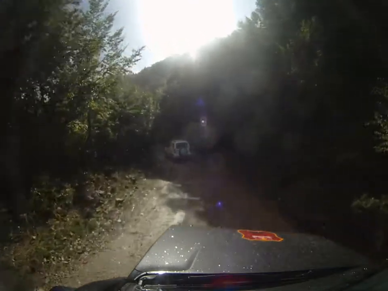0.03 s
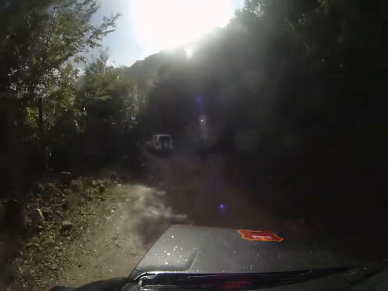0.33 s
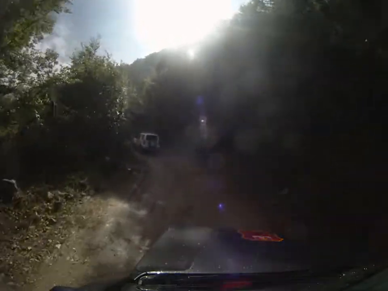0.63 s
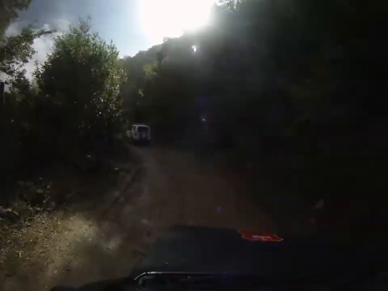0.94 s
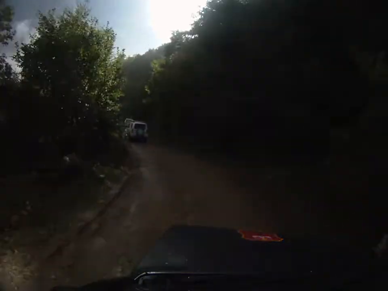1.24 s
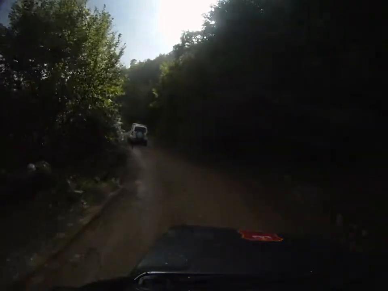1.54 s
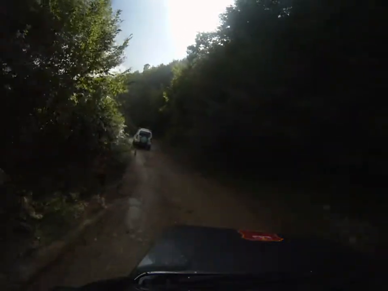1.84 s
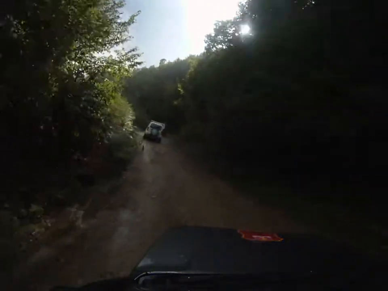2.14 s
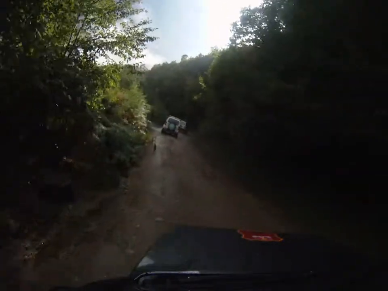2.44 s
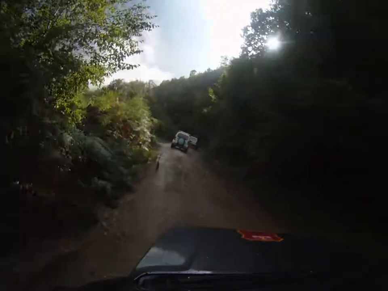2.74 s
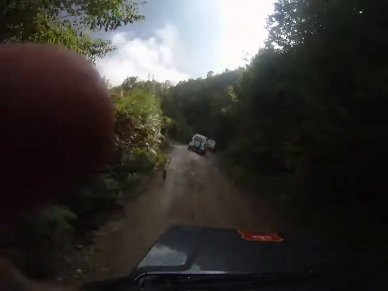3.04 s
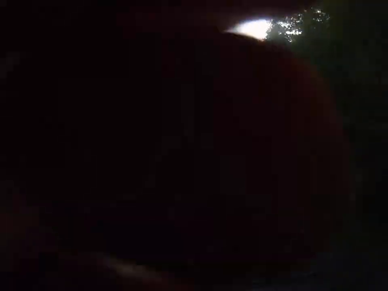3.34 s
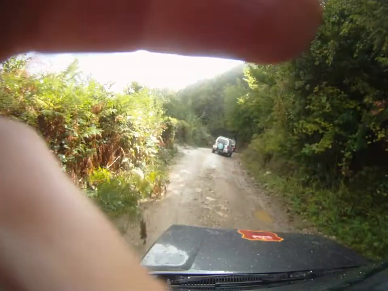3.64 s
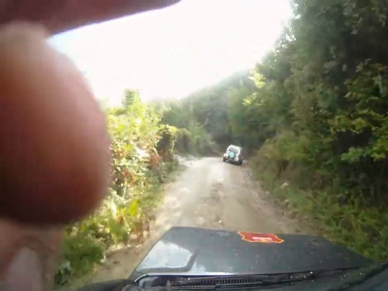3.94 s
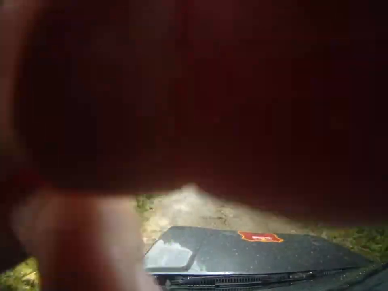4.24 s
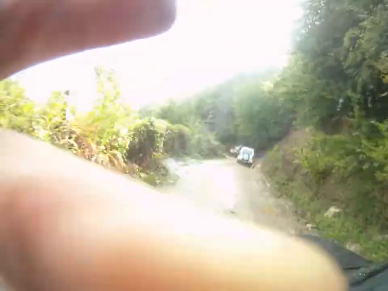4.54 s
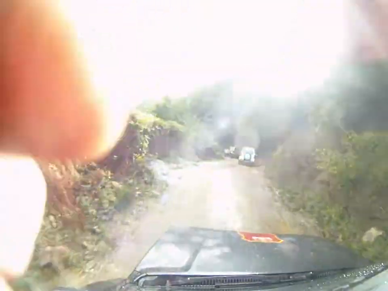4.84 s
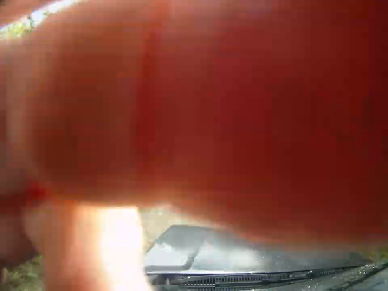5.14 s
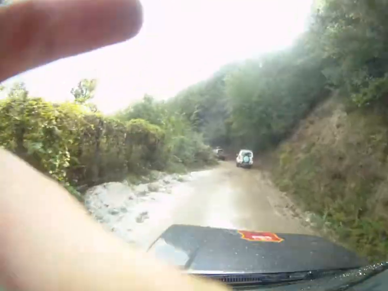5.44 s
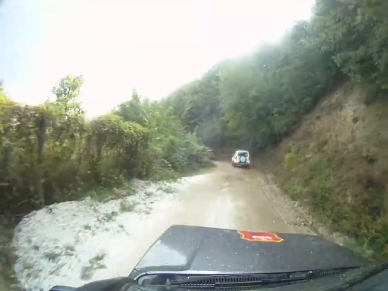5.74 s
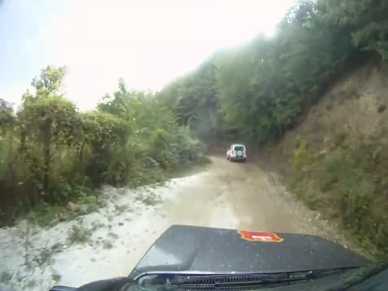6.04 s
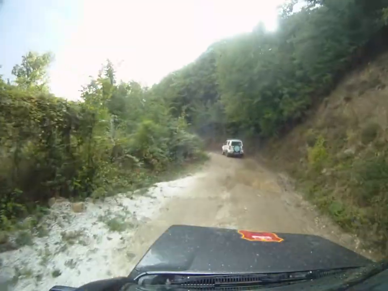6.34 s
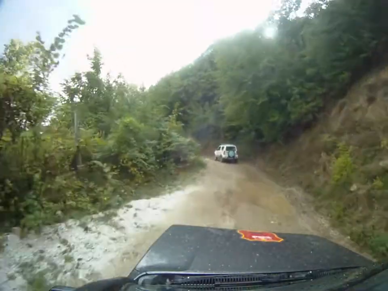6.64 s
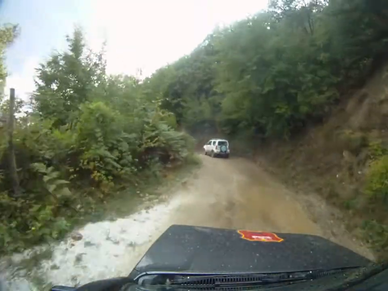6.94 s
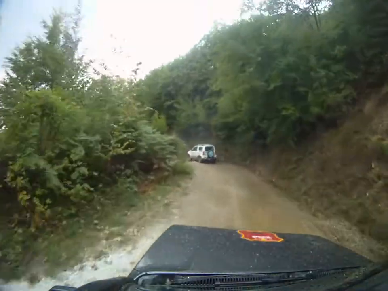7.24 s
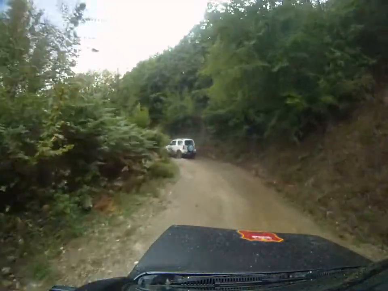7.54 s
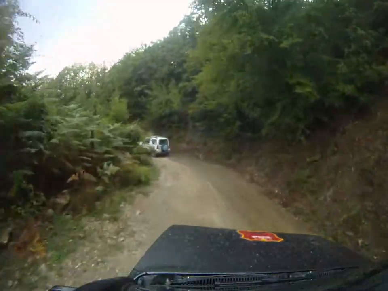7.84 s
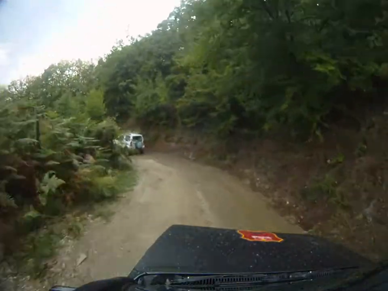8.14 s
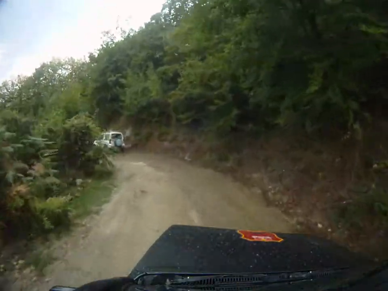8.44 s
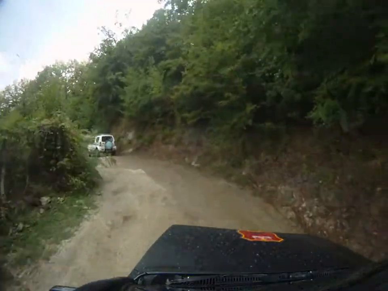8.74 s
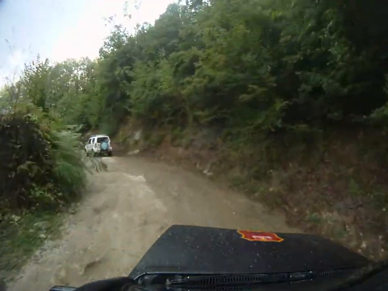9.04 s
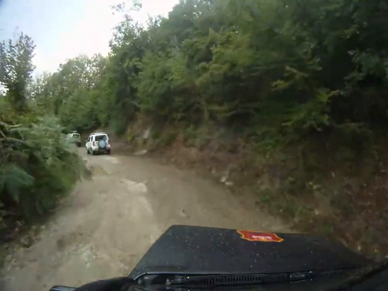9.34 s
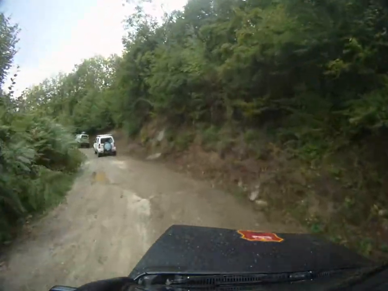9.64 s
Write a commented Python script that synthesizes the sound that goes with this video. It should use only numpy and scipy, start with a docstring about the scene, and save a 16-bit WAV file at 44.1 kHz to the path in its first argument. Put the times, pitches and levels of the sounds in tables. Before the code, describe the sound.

A vehicle's engine booms low as tyres roll over dirt and trim rattles; midway, fingers rub and knock loudly on the microphone.

```python
"""A low engine boom fills the cabin of a 4x4 crawling up a dirt track, surging as the body lurches.
Tyres roar and grind over grit, and bumps set loose trim rattling. The sound reaches a small camera
behind the windscreen, whose case colours the noise and whose electronics whine faintly.
Midway, fingers wipe the lens: beside the microphone they knock on the case, and skin sticks and slips."""
import sys
import numpy as np
from scipy import signal
from scipy.fft import rfft, irfft
from scipy.io import wavfile

SR = 44100
rng = np.random.default_rng(int(sys.argv[2]) if len(sys.argv) > 2 else 0)


def file_out(sig):
    """Save sig as 16-bit WAV at sys.argv[1]."""
    # one column per channel
    cols = np.atleast_2d(sig).T
    # limit, then scale
    lim = np.clip(cols, -1, 1)
    pcm = np.round(lim * 32767).astype(np.int16)
    wavfile.write(sys.argv[1], SR, pcm)


N = 432180
T = np.arange(N) / SR

# Excitation of the tyres, stronger on rough ground: t/s, relative level/dB
ROUGHNESS = [(0, -48.5), (1.2, -46), (1.6, -48.5), (2.4, -44), (2.9, -45.5), (4.5, -45), (5.8, -46),
             (6.4, -50.5), (7.4, -48.5), (7.75, -44.5), (8.15, -48), (9.8, -44)]
# Spectrum of small hard impacts: f/Hz, relative level/dB
GRIT_SPECTRUM = [(500, 4), (1600, 7), (2400, 6.5), (3100, -3), (4400, -7), (7500, -21.5), (10000, -11),
                 (14500, -4.5), (16000, -19)]


def gain_of(db):
    """Amplitude ratio of a level in decibels."""
    return 10 ** (np.asarray(db) / 20)


def unit_rms(x):
    """Normalisation to rms 1."""
    return x / np.sqrt(np.mean(x ** 2) + 1e-20)


def follow(rows):
    """Linear interpolation of each column over time."""
    times, *columns = np.transpose(rows)
    return [np.interp(T, times, column) for column in columns]


def add(mix, start, sound):
    """Superposition of a sound on the mix, from start in seconds."""
    part = mix[max(round(start * SR), 0):][:len(sound)]
    part += sound[:len(part)]


def drift(cutoff_hz):
    """Slow random fluctuation: low-pass noise of rms 1."""
    hz = np.fft.rfftfreq(N, 1 / SR)
    return unit_rms(irfft(rfft(rng.standard_normal(N)) * np.exp(-(hz / cutoff_hz) ** 2), N))


def bell(middle, width):
    """Gaussian envelope of height 1, width seconds wide at half height."""
    out = np.zeros(N)
    near = slice(max(int((middle - 2 * width) * SR), 0), int((middle + 2 * width) * SR))
    out[near] = .5 ** ((2 * (T[near] - middle) / width) ** 2)
    return out


def bursts(per_s, length_s):
    """Shot-noise envelope: soft pulses of uneven size at random moments."""
    starts = rng.uniform(0.08, 1, N) * (rng.random(N) < per_s / SR)
    return unit_rms(signal.oaconvolve(starts, signal.windows.hann(int(length_s * SR)))[:N])


def through_case(x, spectrum, size=4096):
    """Source and resonator: a minimum-phase filter of unit energy joins a spectrum to the case's modes."""
    # Resonances and notches of the camera case: f/Hz, bandwidth/Hz, gain/dB
    modes = [(1110, 250, 7.5), (1292, 150, -5), (1475, 170, 2), (1880, 93, 0), (2182, 550, 8),
             (3650, 180, 3.5), (6013, 524, -12), (8210, 1050, 4.5), (9930, 770, 12.5), (10820, 310, 7),
             (11720, 800, -6), (13000, 250, 0), (13300, 310, 2)]
    hz = abs(np.fft.fftfreq(size, 1 / SR))
    source_hz, source_db = np.transpose(spectrum)
    db = np.interp(np.log(hz + 1), np.log(source_hz), source_db)
    db += sum(height * .5 ** ((2 * (hz - centre) / width) ** 2) for centre, width, height in modes)
    response = np.exp(np.conj(signal.hilbert(np.log(gain_of(db)))))
    ring = np.fft.ifft(response).real[:size // 2]
    return signal.oaconvolve(x, ring / np.linalg.norm(ring))[:N]


def engine(rock_depth=0.62, surge_s=.12, sag_db=-7.5, sag_lead_s=0.086, sag_s=0.039):
    """Amplitude and phase modulation: the rocking body swells and chokes a near-pure cabin boom."""
    # Boom following the throttle: t/s, f/Hz, relative level/dB
    boom = [(0, 57.45, -28.5), (1.2, 57.2, -23), (1.7, 59.2, -20), (2.6, 60.9, -21.5), (3.3, 56, -33.5),
            (4.2, 54.89, -26.5), (4.8, 54.08, -31), (5.7, 59.65, -23), (6.3, 59.74, -31.5),
            (6.9, 60.25, -22.5), (7.5, 58.34, -25.5), (8.1, 60.34, -27.5), (8.6, 61.74, -21),
            (9.2, 62, -22.5), (9.8, 58.84, -26)]
    # Surges as the body lurches: middle t/s, relative level/dB
    lurches = [(.13, -19.5), (.53, -15), (.89, -18), (1.27, -21), (1.9, -20.5), (2.43, -17), (2.76, -19.5),
               (4.56, -36), (5.25, -24.5), (5.41, -21), (6.39, -21), (6.71, -19), (7.35, -19.5),
               (7.6, -19.5), (7.76, -18), (8.38, -23), (8.7, -23), (9.02, -20), (9.59, -18.5)]
    hz, level_db = follow(boom)
    phase = 2 * np.pi * np.cumsum(hz) / SR + .4 * drift(11)
    rocking = gain_of(level_db) * (1 + rock_depth * drift(6.9))
    surges = sum(gain_of(db) * bell(s, surge_s) for s, db in lurches)
    # The boom sags as the body lifts just before each lurch.
    lift_db = sum(sag_db * bell(s - sag_lead_s, sag_s) for s, _ in lurches)
    return np.hypot(rocking, surges) * gain_of(3 + lift_db + drift(44)) * np.sin(phase)


def track():
    """Random excitation by rough ground: body sway, tyre roar, pattering grit and squeaking trim."""
    # Spectra of the swaying body, rolling tyres and rubbing trim: f/Hz, relative level/dB
    sway_spectrum = [(10, -25), (25, 2.5), (45, 8), (70, -2.5), (95, -13.5), (130, -32), (300, -61.5)]
    tyre_spectrum = [(60, 14), (160, 8.5), (225, 19), (290, -2), (400, -3), (560, 7), (750, -1),
                     (1050, 5.5), (1600, 2.5), (2300, -5), (2900, -9.5), (4500, -16), (7000, -33.5),
                     (14500, -11.5), (16000, -68)]
    squeak_spectrum = [(2500, -14), (3700, -18), (4450, 17), (5100, -48), (7500, 13), (9000, -36),
                       (16000, -38)]
    level_db = follow(ROUGHNESS)[0] + occlusion_db()
    body, road, stones, trim = rng.standard_normal((4, N))
    sway_db = -25.5 + 0.68 * (level_db - level_db.mean()) + 3.9 * drift(4.2)
    sway = gain_of(sway_db) * through_case(body, sway_spectrum)
    roar = gain_of(level_db + 3 + drift(3.8)) * through_case(road, tyre_spectrum)
    patter = bursts(per_s=45, length_s=.012) * gain_of(1.5 * drift(12))
    grit = gain_of(level_db - 5) * through_case(stones * patter, GRIT_SPECTRUM)
    rubs = bursts(per_s=11, length_s=0.007)
    squeaks = gain_of(level_db - 28) * through_case(trim * rubs, squeak_spectrum)
    return sway + roar + grit + squeaks


def rattles(tick_t60=0.056, clatter_t60=0.29, thud_t60=0.3):
    """Damped impacts: ticks, thuds and clatter decay exponentially over a light jiggle that follows the
    roughness of the ground, drops while the microphone is covered and wanders at random."""
    # Ticks of grit and trim: t/s, level/dB
    tick_events = [(0.052, -33.5), (0.266, -36), (0.35, -40), (.523, -29.5), (0.697, -32.5), (1.193, -31),
                   (1.35, -34), (1.99, -29.5), (2.15, -35), (2.207, -36), (2.848, -40), (7.276, -36),
                   (9.054, -28)]
    # Stones and ruts jolt the body: t/s, clatter level/dB, thud level/dB, rise time/s
    bumps = [(.41, -36, -39, 0.023), (.523, -44, -35, .004), (.70, -36.5, -43, 0.028),
             (0.896, -68, -33, 0.0061), (1.193, -59, -44, .005), (1.351, -47, -37, 0.0043),
             (1.991, -53, -39, 0.0056), (2.419, -41, -31, 0.0089), (2.846, -38.5, -34.5, 0.0034),
             (5.8, -39, -52, .006), (7.32, -39, -52, 0.026), (7.375, -43, -37, 0.0093),
             (7.572, -43, -34, 0.013), (7.6, -34, -36, 0.045), (7.79, -38, -56, .025),
             (9.053, -24.5, -27.5, 0.0031), (9.552, -37, -44, .02)]
    # Spectra of the loose parts and the jolted body: f/Hz, relative level/dB
    clatter_spectrum = [(150, -30), (600, -3), (1080, -3.5), (1500, 0.5), (1850, 4), (2300, -13.5),
                        (3000, -16.5), (4500, -53), (10000, -22), (16000, -23)]
    thud_spectrum = [(60, 6), (150, 3.5), (225, 10.5), (310, -19.5), (1500, -40)]
    t = T[:SR // 2]
    ticks, shake, thuds = np.zeros((3, N))
    for s, db in tick_events:
        add(ticks, s, gain_of(db - 60 * t / tick_t60) * np.minimum(t / 0.0041, 1))
    for s, clatter_db, thud_db, rise in bumps:
        onset = np.minimum(t / rise, 1)
        add(shake, s, onset * gain_of(clatter_db - 60 * t / clatter_t60))
        add(thuds, s, onset * gain_of(thud_db - 60 * t / thud_t60))
    # Small ruts shake the loose parts all the way.
    jiggle_db = follow(ROUGHNESS)[0] + occlusion_db() - 13.5 + 2.5 * np.minimum(drift(19), 2)
    shake = np.hypot(shake, gain_of(jiggle_db))
    tick_noise, shake_noise, thud_noise = rng.standard_normal((3, N))
    clatter = shake * shake_noise * bursts(per_s=9200, length_s=0.0038)
    return (through_case(ticks * tick_noise, GRIT_SPECTRUM)
            + through_case(clatter, clatter_spectrum)
            + through_case(thuds * thud_noise, thud_spectrum))


def whine(split_hz=124):
    """Beating: the camera's electronics emit two faint, close tones that flutter in phase and level."""
    # Lower tone of the pair: t/s, f/Hz, level/dB
    lower_tone = [(5.80, 11940, -64), (5.81, 12314, -70), (6.97, 12314, -70), (6.98, 11940, -66)]
    hz, level_db = follow(lower_tone)
    phases = [2 * np.pi * np.cumsum(hz + offset) / SR + .7 * drift(22) for offset in (0, split_hz)]
    return gain_of(level_db + 3 * drift(14)) * np.sin(phases).sum(axis=0)


def knocks(crack_t60=0.022, rebound=0.083, mount_hz=62, mount_t60=0.57):
    """Impulse response: a finger's blow gives a plastic crack, a low push and a damped swing of the mount."""
    # Fingers strike the case: t/s, relative crack level/dB, push level/dB, push duration/ms
    blows = [(2.9713, -6.5, -20, 3), (2.9751, -7.5, -3.5, 6.92), (3.238, -12.5, -5, 6.6),
             (3.3658, -16.5, -19, 2.2), (3.446, -40, -7.5, 3.9), (3.5116, -13, -10, 2.7),
             (3.594, -31, -9, 4.9), (3.7151, -12.5, -15, 2.1), (3.776, -44, -9.5, 5.5),
             (3.98, -11.5, -6.5, 5.2), (4.029, -6, -6, 1.8), (4.061, -30, -17, 3), (4.334, -16.5, -5, 4.6),
             (4.4097, -8, 5.5, 3.7), (4.799, -20, -7.5, 2.5), (4.884, -8.5, -3.5, 2.8),
             (4.926, -34, -8.5, 1.9), (4.9885, -9, -1.5, 2.7), (5.114, -17.5, -3.5, 2.9),
             (5.196, -16.5, -36, 1.77), (5.5243, -11, -6.5, 2.2), (5.5823, -10, 2.5, 3.55)]
    # Spectrum of struck plastic: f/Hz, relative level/dB
    crack_spectrum = [(400, -23), (850, -8.5), (1550, 1.5), (2200, -8), (3300, -10), (5000, -19),
                      (8000, -20.5), (10000, -22.5), (14500, -20), (16000, -43)]
    t = T[:SR // 5]
    cracks, pushes = np.zeros((2, N))
    swing = np.sin(2 * np.pi * mount_hz * t) * gain_of(-60 * t / mount_t60)
    for s, crack_db, push_db, push_ms in blows:
        push = np.sin(np.pi * np.minimum(t * 1000 / push_ms, 1)) ** 2
        add(cracks, s, gain_of(crack_db + 1 - 60 * t / crack_t60) * np.minimum(t / 0.00011, 1))
        add(pushes, s, gain_of(push_db) * (rebound * swing - push))
    return through_case(cracks * unit_rms(rng.standard_normal(N)), crack_spectrum) + pushes


def occlusion_db(seal_s=.02, lift_s=0.11):
    """Insertion loss: a fingertip over the microphone opening lowers the track noise and the jiggle."""
    # The opening is sealed: start t/s, end t/s, gain/dB
    covers = [(3.03, 3.35, -8), (4.423, 4.504, -3), (5.608, 5.772, -14.5)]
    return sum(db * np.clip((T - start) / seal_s + .5, 0, 1) * np.clip((end - T) / lift_s + .5, 0, 1)
               for start, end, db in covers)


def slips(per_s, spread_db):
    """Poisson process: tiny slips at random moments, a few of them large."""
    size = gain_of(spread_db * np.minimum(rng.exponential(1, N), 4))
    return unit_rms(size * rng.choice([-1, 1], N) * (rng.random(N) < per_s / SR))


def hand_cavity(x, reflection=0.31, longest_s=.003, count=5):
    """Comb filtering: very short echoes in the hollow of the hand colour the sound."""
    echoes = sum(rng.choice([-1, 1]) * np.roll(x, int(rng.uniform(.1, 1) * longest_s * SR))
                 for _ in range(count))
    return unit_rms(x + reflection * echoes)


def wiping(rise_s=0.014, fall_s=0.031):
    """Stick-slip friction: sliding skin hisses and drags, rasps more as it grips, and squeaks on catching."""
    # Finger strokes: start t/s, end t/s, relative level/dB, extra rasp/dB, swell over the stroke/dB
    strokes = [(3.04, 3.235, -43, 5, 22), (3.23, 3.376, -47, 5, 3), (3.382, 3.503, -38.5, 1, -28),
               (3.509, 3.598, -27, 4.5, 17), (3.619, 3.833, -32, 2, -14.5), (3.816, 3.921, -31.5, 10, -4.5),
               (3.965, 4.012, -38, 5, -18), (4.004, 4.227, -29.5, 2.5, 9), (4.287, 4.351, -33, 6.5, 5),
               (4.521, 4.596, -32.5, -3, 0.5), (4.613, 4.744, -35, 1, 15.5), (4.776, 4.865, -37.5, 7, -4),
               (4.874, 4.996, -32, 6, -16.5), (5.013, 5.141, -33, 1, 2.5), (5.206, 5.348, -42, 11, -19),
               (5.38, 5.512, -41, -5, -32.5), (5.491, 5.584, -36, 6, 7.5)]
    # Skin catches: middle t/s, relative level/dB, duration/s, f/Hz
    scuffs = [(3.186, -12, 0.0066, 2140), (3.569, -15, 0.015, 2155), (3.85, -10.5, 0.009, 1850),
              (3.883, -10, 0.0083, 2030), (4.03, -19, 0.014, 1100), (4.063, -10.5, 0.0082, 2186),
              (4.171, -17, 0.037, 402), (4.375, -28, 0.042, 1170), (4.901, -14, .014, 2105),
              (5.199, -12.5, .005, 2003), (5.31, -35, 0.13, 1126)]
    # Spectra of skin rubbing on the case: f/Hz, relative level/dB
    hiss_spectrum = [(300, -2), (1000, -11), (2100, 5.5), (2800, 3), (4200, 8), (5200, -4), (8000, -3),
                     (10000, -10), (13200, -62), (14100, 9.5), (14700, -19), (16000, -38)]
    rasp_spectrum = [(200, -15.5), (640, -11.5), (880, 4), (1100, -1.5), (1600, 4.5), (2200, 1.5),
                     (2700, -18), (5000, -24), (15000, -16.5)]
    drag_spectrum = [(40, -5), (130, 6.5), (250, -6.5), (430, -6.5), (650, -6.5), (1500, -35.5)]
    pressure, out = drift(51), np.zeros(N)
    hiss = through_case(gain_of(0.62 * pressure) * slips(per_s=12000, spread_db=5.5), hiss_spectrum)
    rasp = through_case(gain_of(1.4 * pressure) * slips(per_s=1300, spread_db=3), rasp_spectrum)
    drag = through_case(gain_of(4.5 * pressure) * slips(per_s=660, spread_db=4.5), drag_spectrum)
    for start, end, level_db, grip_db, swell_db in strokes:
        span = slice(int((start - rise_s) * SR), int((end + 2 * fall_s) * SR))
        t = T[span]
        contact = (1 + np.tanh(2 * (t - start) / rise_s)) * (1 + np.tanh(2 * (end - t) / fall_s)) / 4
        along = np.clip((t - start) / max(end - start, .01), 0, 1) - .5
        speed = 1 + 0.13 * np.cos(2 * np.pi * along)  # fastest in mid-stroke
        envelope = gain_of(level_db + swell_db * along) * speed * contact
        for texture, db in (hiss, 1.5), (rasp, grip_db + 0.5), (drag, 0.8):
            out[span] += gain_of(db) * envelope * hand_cavity(texture[span])
    jitter = 1.11 * drift(230)  # uneven stick and slip
    for s, db, duration, hz in scuffs:
        out += gain_of(db - 0.5) * bell(s, duration) * np.sin(2 * np.pi * hz * T + jitter)
    return out


def scene():
    """Superposition of the vehicle, the handling and the whine at one microphone."""
    return (engine() + track() + rattles() + wiping() + knocks() + whine())[None]


def record(dry, cutoff_hz=15500):
    """Clipping and band limiting: the hardest knocks overload the input, ahead of a low-pass filter."""
    low_pass = signal.firwin(255, cutoff_hz, window=("kaiser", 9), fs=SR)
    return signal.oaconvolve(np.clip(dry, -1, 1), low_pass[None], "same")


dry = scene()
out = record(dry)
file_out(out)
```